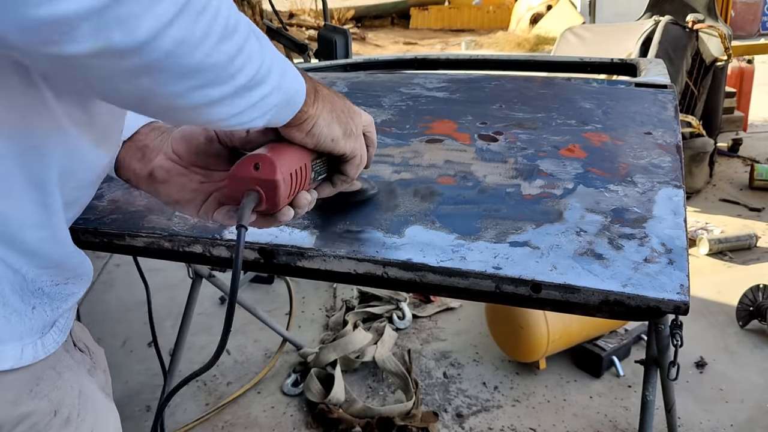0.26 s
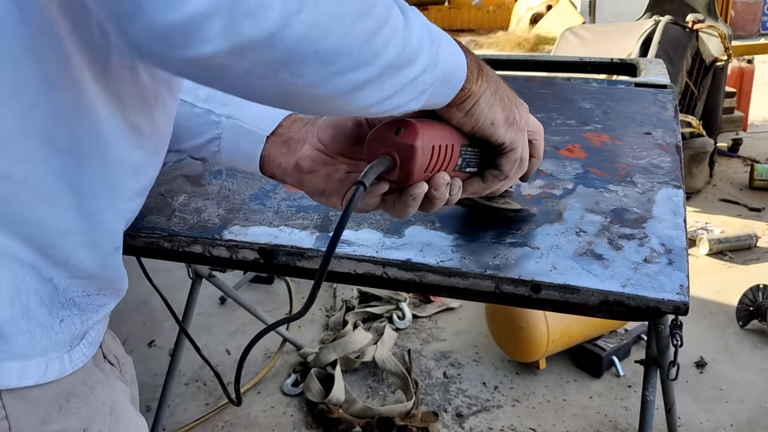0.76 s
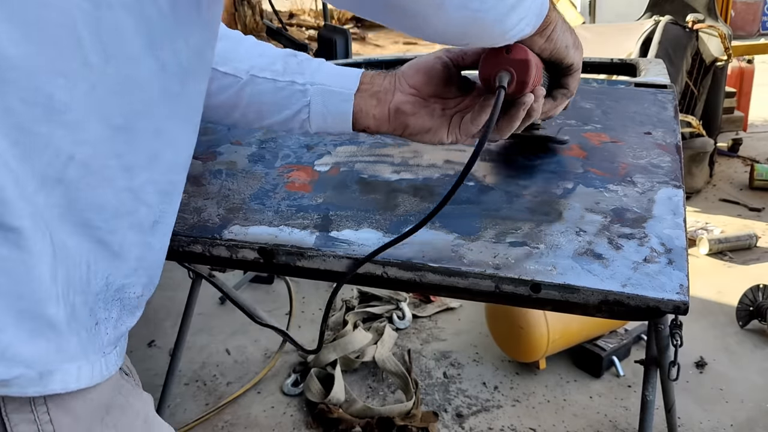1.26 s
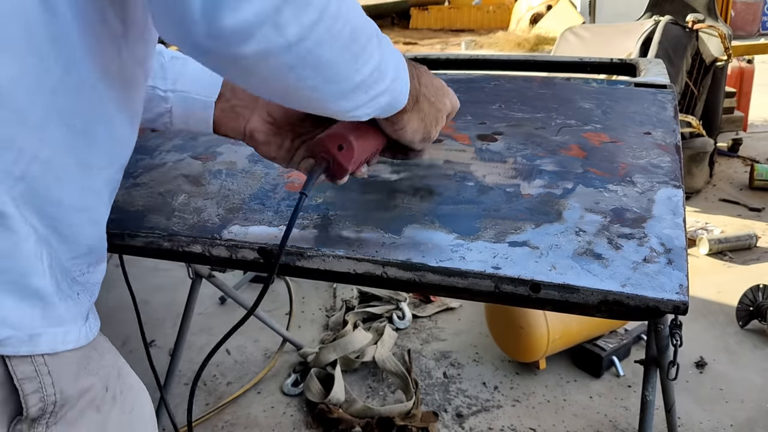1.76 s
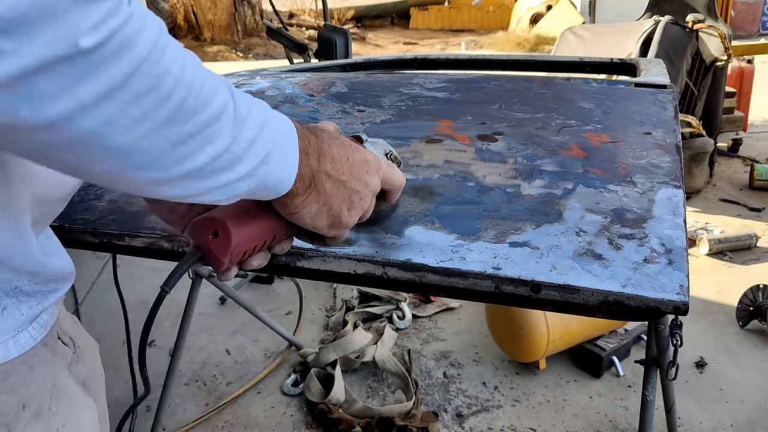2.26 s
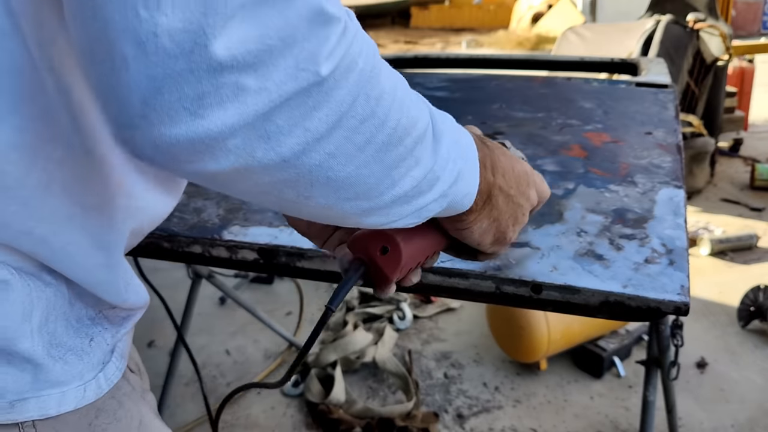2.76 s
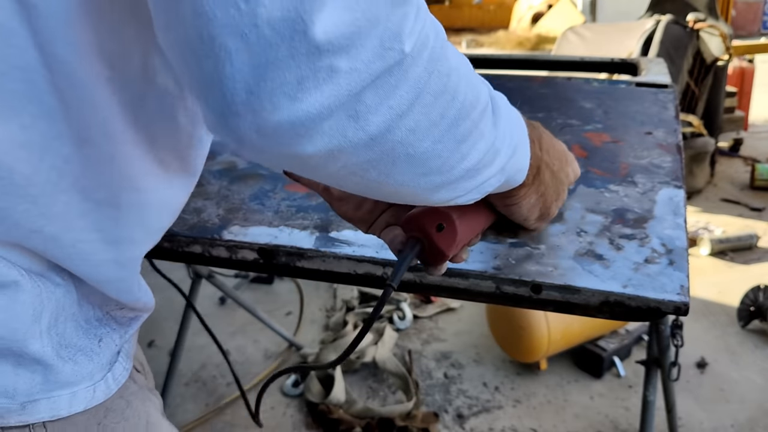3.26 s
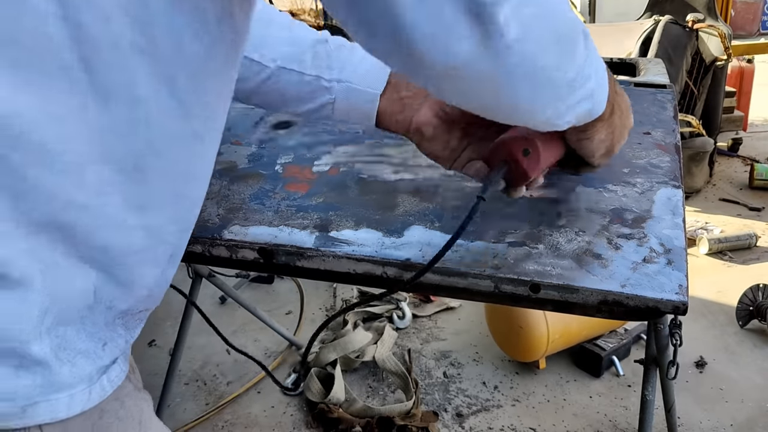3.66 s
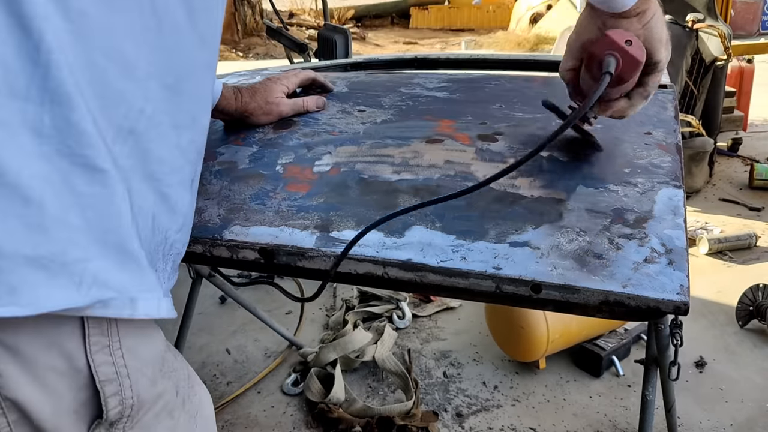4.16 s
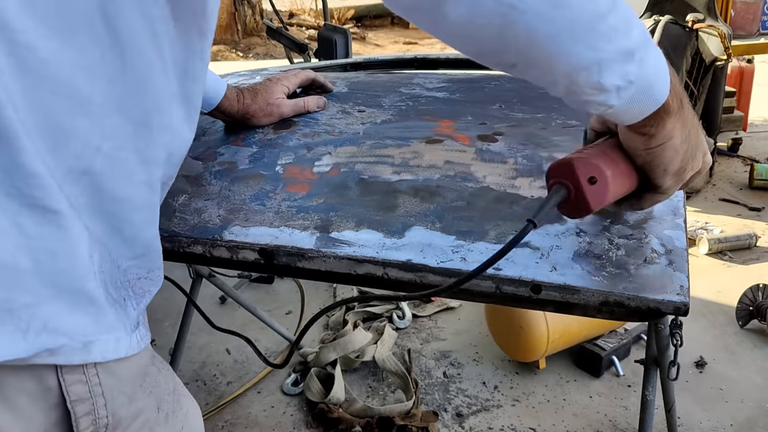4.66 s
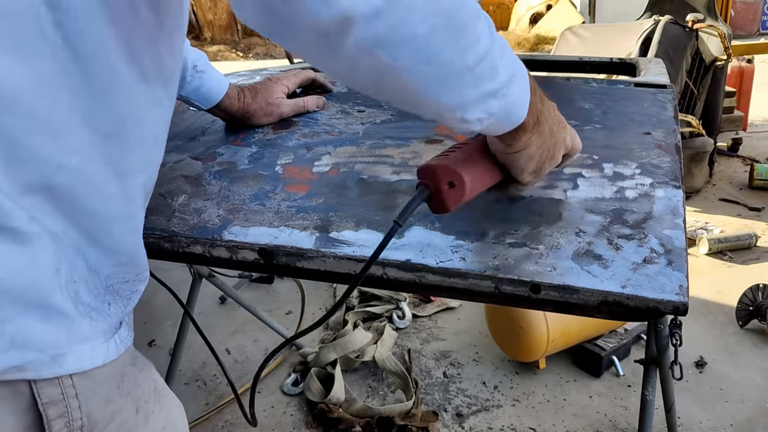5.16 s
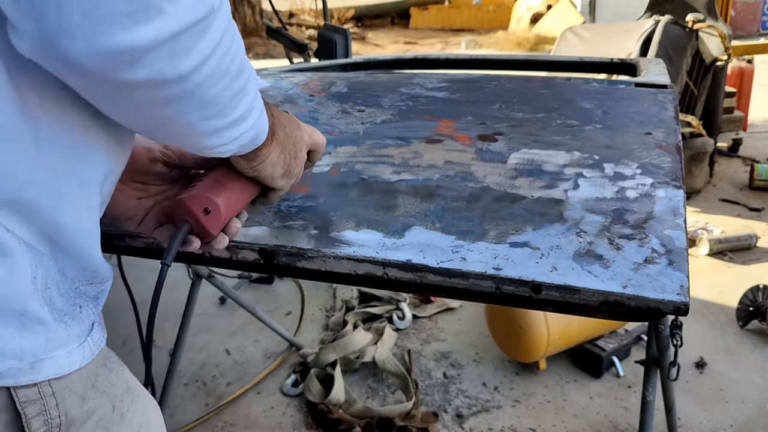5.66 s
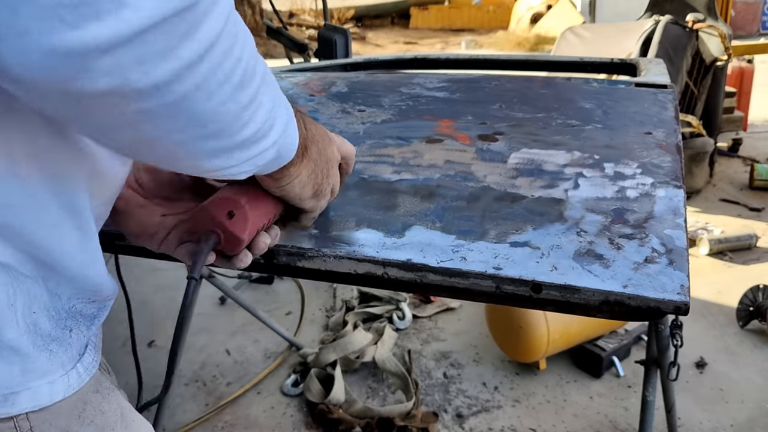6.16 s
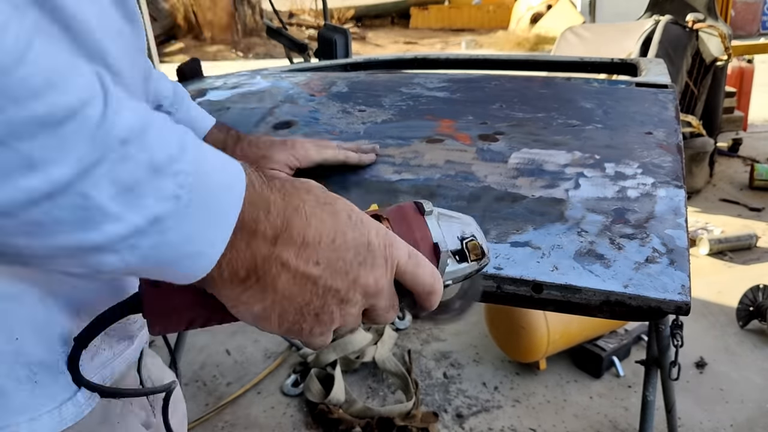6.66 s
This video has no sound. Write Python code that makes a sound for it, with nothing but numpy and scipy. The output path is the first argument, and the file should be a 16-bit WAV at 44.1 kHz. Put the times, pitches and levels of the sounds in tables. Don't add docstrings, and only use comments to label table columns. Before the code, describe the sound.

A handheld power tool whines shrilly as its wire brush rasps over a steel panel, pitch sagging and racing, then coasts down hissing outdoors.

```python
import sys
import numpy as np
from scipy import signal
from scipy.fft import rfft, irfft, next_fast_len
from scipy.io import wavfile
from scipy.ndimage import uniform_filter1d

SR = 44100
rng = np.random.default_rng(int(sys.argv[2]) if len(sys.argv) > 2 else 0)


def ratio(d):
    e = np.asarray(d, float) / 20
    return 10 ** e


def file_out(sig):
    cols = np.atleast_2d(sig).T
    lim = np.clip(cols, -1, 1)
    pcm = np.round(lim * 32767).astype(np.int16)
    wavfile.write(sys.argv[1], SR, pcm)


N = 305613
CONTROL_STEP = 40
STOP_S, SETTLED_S = 6.67, 6.75

# (f/Hz, left-right likeness 0..1)
LIKENESS = [(61, 0.01), (301, 1), (601, 0.88), (1201, 1), (2501, 1), (5001, 0.86), (9001, 0.48),
            (14001, 0.062)]
# (t/s, level/dB, half length/s)
SKIPS = [
    (0.235, 2, 0.01),
    (0.7, -2.5, 0.026),
    (3.53, -0.5, 0.022),
    (3.87, 3.5, 0.011),
    (4.47, -4, 0.034),
    (4.58, -3, 0.04),
    (4.76, -6.5, 0.016),
    (6.22, -14, 0.012),
]


def in_time(rows):
    s, *columns = np.transpose(rows)
    return [np.interp(np.arange(N) / SR, s, column) for column in columns]


def at_hz(points, hz):
    table_hz, value = np.transpose(points)
    return np.interp(np.log(hz), np.log(table_hz), value)


def bumps(rows):
    s = np.arange(0, N + CONTROL_STEP, CONTROL_STEP) / SR
    total = sum(height * np.exp(-.5 * ((s - at) / half) ** 2) for at, height, half in rows) + 0 * s
    return np.interp(np.arange(N) / SR, s, total)


def rms_one(x):
    return x / np.sqrt(np.mean(x ** 2) + 1e-20)


def drift(rate):
    r = np.exp(-2 * np.pi * rate * CONTROL_STEP / SR)
    coarse = rng.standard_normal(N // CONTROL_STEP + 2002)
    slow = signal.lfilter([1], [1, -2 * r, r * r], coarse)[2000:]
    return np.interp(np.arange(N) / CONTROL_STEP, np.arange(len(slow)), rms_one(slow))


def snags(low_hz, high_hz):
    band = signal.butter(2, [low_hz, high_hz], "band", fs=SR / CONTROL_STEP, output="sos")
    coarse = signal.sosfilt(band, rng.standard_normal(N // CONTROL_STEP + 2))
    return np.interp(np.arange(N) / CONTROL_STEP, np.arange(len(coarse)), rms_one(coarse))


def coloured(spectrum):
    size = next_fast_len(N)
    hz = np.maximum(np.arange(size // 2 + 1) * SR / size, 1)
    mid, side = rfft(rng.standard_normal((2, size)))
    alike = np.clip(at_hz(LIKENESS, hz), 0, 1)
    pair = np.sqrt(1 + alike) * mid + np.sqrt(1 - alike) * side * [[1], [-1]]
    return rms_one(irfft(pair * ratio(at_hz(spectrum, hz)), size)[:, :N])


def patchy(x, patchy_db):
    frames = signal.stft(x, SR, nperseg=512)[2]
    field = uniform_filter1d(rng.standard_normal(frames.shape[1:]), size=9, axis=0)
    field = uniform_filter1d(field, size=7, axis=1)
    frames = frames * ratio(patchy_db * rms_one(field))
    return rms_one(signal.istft(frames, SR, nperseg=512)[1][:, :N])


def shaft():
    # (t/s, speed/turns per s)
    pressed = [(0.0, 876.0), (0.086, 890.0), (0.799, 928.0), (1.282, 940.0), (1.903, 809.0), (2.395, 881.0),
               (3.138, 831.0), (3.412, 841.0), (3.469, 858.0), (3.538, 819.0), (3.563, 845.0),
               (3.677, 790.0), (3.725, 782.0), (4.422, 828.0), (4.498, 779.0), (4.954, 821.0),
               (5.161, 817.0), (6.701, 848.0)]
    # (t/s, change/turns per s, half
    # length/s)
    jolts = [(0.17, -14.0, 0.03), (0.54, 32.0, 0.038), (0.685, -29.0, 0.043), (1.026, -11.0, 0.109),
             (1.133, 12.0, 0.017), (1.217, -31.0, 0.025), (1.462, 13.0, 0.025), (1.586, 36.0, 0.026),
             (1.744, 22.0, 0.023), (1.888, 70.0, 0.038), (2.035, 34.0, 0.031), (2.189, -38.0, 0.044),
             (2.759, -22.0, 0.053), (2.816, 19.0, 0.043), (2.9, -16.0, 0.013), (3.076, -20.0, 0.017),
             (3.31, 20.0, 0.03), (3.593, -41.0, 0.023), (4.075, -37.0, 0.13), (4.151, 45.0, 0.039),
             (4.327, 17.0, 0.025), (4.745, 25.0, 0.017), (4.974, 39.0, 0.065), (5.35, -37.0, 0.019),
             (5.453, 32.0, 0.046), (5.593, 15.0, 0.022), (5.686, -13.0, 0.027), (5.85, -25.0, 0.043),
             (6.151, 66.0, 0.066), (6.351, -21.0, 0.032),
             (0.048, -12, 0.008), (0.216, -8, 0.05), (0.269, -13, 0.006), (0.305, 10, 0.011),
              (0.443, -12, 0.03), (0.553, -12, 0.011), (1.171, -11, 0.006), (1.449, 12, 0.006),
              (1.469, -12, 0.006), (1.792, -6, 0.02), (1.87, 7, 0.015), (1.906, -11, 0.008),
              (1.991, 10, 0.008), (2.095, -11, 0.011), (2.199, -10, 0.006), (2.281, 15, 0.008),
              (2.317, -13, 0.008), (2.353, 12, 0.008), (3.241, 11, 0.006), (3.528, -18, 0.006),
              (3.654, 11, 0.006), (3.676, -15, 0.006), (3.821, 11, 0.006), (3.857, 23, 0.006),
              (3.897, 18, 0.006), (3.939, -11, 0.02), (3.997, 11, 0.006), (4.071, -21, 0.006),
              (4.119, 14, 0.006), (4.302, 10, 0.006), (4.46, 11, 0.006), (4.504, -8, 0.015),
              (4.612, -10, 0.011), (4.671, 11, 0.006), (4.797, -10, 0.008), (4.955, 16, 0.011),
              (5.001, -10, 0.015), (5.184, 12, 0.006), (5.206, -12, 0.006), (5.533, -10, 0.008),
              (5.769, -10, 0.006), (5.831, -14, 0.006), (5.976, 10, 0.008), (6.114, 8, 0.011),
              (6.158, -10, 0.008), (6.198, 11, 0.008), (6.23, 34, 0.011), (6.29, 10, 0.008),
              (6.461, 9, 0.05), (6.617, -23, 0.015)]
    # (t/s, gain/turns per s, rise/s, fall/s)
    lifts = [
        (0.214, 136.0, 0.056, 0.11),
        (3.824, 142.0, 0.05, 0.032),
        (5.219, 302.0, 0.141, 0.202),
        (6.198, 216.0, 0.07, 0.17),
        (6.566, 132.0, 0.052, 0.022),
    ]
    s = np.arange(N) / SR
    turns = in_time(pressed)[0] + bumps(jolts)
    for at, gain, rise, fall in lifts:
        up = np.clip((s - at) / rise, 0, 1)
        smooth_rise = up ** 2 * (3 - 2 * up)
        turns = turns + gain * smooth_rise * np.exp(-np.maximum(s - at - rise, 0) / fall)
    return turns


def hold():
    # (t/s, level/dB, tilt of the high overtones/dB, left-right/dB)
    held = [(0.0, -45.5, -6.5, 3.5), (0.88, -49, -1.8, 2.5), (1.32, -48, -3.5, 2), (1.37, -47, -4.5, 3),
            (2.23, -48.5, -2.5, 1), (2.37, -44.5, -6, 3), (3.11, -50, -0.1, 0.7), (3.57, -51.5, -1.5, 1),
            (3.69, -48.5, -2.5, 1), (4.11, -50.5, -3, 1.5), (4.54, -48.5, -3, 1.5), (5.61, -46.5, -8, 2),
            (5.83, -47.5, -5.5, 2), (6.18, -45, -7.5, 3), (6.6, -46.5, -4, 2), (6.65, -55.5, -4, 3),
            (6.72, -63.5, 14, 5)]
    level_db, tilt_db, pan_db = in_time(held)
    skips_db = bumps(SKIPS)
    return level_db + 0.74 * skips_db, level_db + tilt_db + skips_db, pan_db


def whine(wobble_hz, slow_db, flutter, flutter_hz):
    # (f/Hz, level in the group/dB)
    body = [(801, -12), (1701, -5.5), (2201, -8.5), (2401, -14), (2651, -16), (3051, -5.5), (3501, -14.5),
            (4201, -11), (4601, -7.5), (5401, -9), (6101, -5), (7001, -9), (8701, -12.5), (11001, -6.5)]
    # (f/Hz, left-right/dB)
    lean_table = [(701, 1), (2401, 0), (8001, -1.5), (15001, 6)]
    # (t/s, multiple, level/dB, half length/s)
    swells_and_dips = [(0.754, 14, 4, 0.6), (0.992, 11, -3.5, 0.52), (1.116, 8, -5, 0.43), (1.283, 3, 3, 0.14),
                       (1.51, 4, 10, 0.085), (2.29, 3, -12, 0.072), (2.507, 3, 8, 0.13), (2.62, 5, 7, 0.051),
                       (2.76, 4, 5.5, 0.095), (2.91, 8, -5, 0.68), (3.317, 15, -9, 0.39), (3.313, 6, 6, 0.32),
                       (3.342, 7, 5, 0.1), (3.71, 5, 7.5, 0.058), (4.012, 8, -2, 0.47), (4.065, 3, -15, 0.026),
                       (4.422, 7, 3, 1), (4.641, 3, -15.5, 0.13), (4.802, 13, 5, 0.34), (4.923, 11, 9, 0.13),
                       (5.147, 4, 4.5, 0.79), (5.363, 9, -4, 0.048), (5.374, 4, 13, 0.04), (5.382, 6, -11.5, 0.16),
                       (5.59, 16, -25, 0.29), (5.881, 3, 8, 0.12), (5.91, 7, -6, 0.1), (6.214, 4, 9.5, 0.066),
                       (6.287, 6, -7, 0.072), (6.34, 5, -13, 0.023),
                       (0.267, 2, 19, 0.016), (0.31, 2, 18.5, 0.015), (0.467, 1, -12, 0.066), (1.204, 2, 6.5, 0.25),
            (1.37, 1, -11.5, 0.34), (2.234, 2, -14, 0.072), (2.567, 1, -12, 0.18), (3.916, 2, -11, 0.08),
            (4.274, 1, -10, 0.08), (4.653, 1, 11, 0.18), (4.766, 2, 4, 0.18), (5.918, 1, 8, 0.2),
            (5.982, 2, 16, 0.098), (6.39, 1, -10, 0.045), (6.556, 2, -12, 0.12),
                       (2.16, 1, 10.5, 0.076),
        (1.07, 1, 8, 0.058),
        (1.9, 2, 5, 0.054),
        (1.94, 1, 11, 0.046),
        (4.02, 1, 13.5, 0.058),
        (4.7, 1, 11.5, 0.071),
        (4.97, 1, -12, 0.051),
        (6.62, 3, 2, 0.014),
                       (0.38, 13, 4, 0.052), (0.438, 7, 3, 0.084), (0.519, 5, 2.5, 0.098), (0.54, 15, 4, 0.18),
               (0.55, 3, 0, 0.058), (0.99, 10, -8, 0.056), (1.603, 3, 2.5, 0.44), (1.686, 8, 7.5, 0.053),
               (1.696, 13, 3.5, 0.11), (1.95, 15, -1, 0.12), (2.38, 11, -7, 0.081), (2.515, 7, 5, 0.021),
               (2.67, 7, -4.5, 0.083), (3.096, 5, 2.5, 0.12), (3.24, 4, 11, 0.02), (3.27, 8, 7.5, 0.039),
               (3.772, 16, 4, 0.18), (3.88, 7, -1.5, 0.044), (4.213, 4, -12, 0.042), (4.34, 13, 4.5, 0.091),
               (4.94, 11, -2.5, 0.068), (5.08, 7, -1.5, 0.22), (5.402, 3, 6.5, 0.057), (5.41, 6, 2, 0.32),
               (5.53, 7, 3.5, 0.099), (5.587, 13, 3.5, .2), (5.83, 11, 5.5, 0.17), (5.852, 9, -5, .07),
               (5.97, 15, -4, 0.15), (6.2, 7, 5, 0.093), (6.64, 4, 10, 0.037), (6.635, 5, 4, 0.033),
               (0.29, 1, 7, 0.022), (3.29, 1, 3.5, 0.27), (5.3, 1, 2.5, 0.44),
                       (0.828, 13, 7, 0.039), (0.872, 3, -5.5, 0.07), (0.986, 6, -5, 0.056), (1.98, 17, -6, .08),
              (2.36, 13, -6, 0.09), (2.797, 9, -2, 0.41), (2.84, 17, -10, .3), (3.65, 11, -4.5, .2),
              (3.75, 16, -6, .13), (3.83, 17, -8, .3), (4.74, 10, -2.5, .3), (4.76, 15, -1, 0.24),
              (5.06, 14, -5, .08), (5.76, 12, 2.5, .2), (4.385, 2, -8, 0.041), (3.422, 13, 1, 0.04),
              (3.42, 14, 3, 0.071)]
    # (t/s, level/dB, half length/s)
    blurs = [
        (0.24, -1, 0.024),
        (1.09, -1.5, .03),
        (3.53, -2, 0.017),
        (3.65, 0, 0.094),
        (3.865, -4.5, 0.015),
        (4.2, 2, 0.036),
        (4.6, -1.5, .07),
        (5.1, -1, 0.085),
        (5.6, 0.5, 0.13),
        (6.645, -2, 0.017),
    ]
    fan_order = 18
    low_db, fan_db = -68.5, -46.5
    mid_db, high_db, pan_db = hold()
    s = np.arange(N) / SR
    turns = shaft()
    fan_db = fan_db + bumps(SKIPS) - np.clip(fan_order * turns - 15450, 0, 400)
    glide_db = -0.5 * np.abs(np.gradient(turns)) * SR / 1000
    load = np.clip((980 - turns) / 120, .4, 1.8)
    turns = turns + load * wobble_hz * snags(20, 46) + 1.4 * drift(90)
    phase = 2 * np.pi * np.cumsum(turns) / SR
    grip_db = 1.0 * drift(12.3)
    blur_db = bumps(blurs)
    moments = swells_and_dips
    out = np.zeros((2, N))
    for k in range(1, 20):
        hz = k * np.mean(turns)
        if k == fan_order:
            level_db = fan_db
        else:
            group_db = low_db if k < 3 else mid_db if k < 10 else high_db
            level_db = group_db + at_hz(body + [(15000, -11)], k * turns)
        caught_db = bumps([(at, db, half) for at, multiple, db, half in moments if multiple == k])
        level_db = level_db + caught_db + (blur_db + glide_db) * (k > 2)
        level_db = level_db + grip_db + slow_db * drift(0.87)
        carrier = np.exp(1j * (k * phase + rng.uniform(0, 2 * np.pi)))
        rate = flutter_hz * k ** 0.38
        loose = flutter * (k / 7) ** 0.2 * ratio(-.6 * np.maximum(caught_db, 0))
        if k == fan_order:
            loose = loose * .45
        mid = 1 + loose * (snags(9, 34 + rate) + 1j * drift(rate))
        unlike = 1 - np.clip(at_hz(LIKENESS, hz), 0, 1)
        side = np.sqrt(unlike / 2) * (drift(rate * 0.61) + 1j * drift(rate * 0.35))
        level = ratio(level_db) / np.sqrt(.5 + loose ** 2)
        lean = ratio((pan_db + at_hz(lean_table, hz)) / 2 * [[1], [-1]])
        end_s = STOP_S + .01 - .06 * (k < 3)
        fade = np.clip((end_s - s) / .03, 0, 1)
        out += fade * level * lean * np.real(carrier * (mid + side * [[1], [-1]]))
    return out


def bristles():
    # (f/Hz, level per Hz/dB)
    wire = [(1510, -26), (2410, -18.5), (3210, -11), (4410, -8.5), (6010, -10.5), (8510, -10.5),
            (11010, -6.5), (14010, -4), (16010, -13)]
    # (t/s, level/dB)
    rasp = [(0, 0), (0.75, -0.5), (1.05, 1), (1.65, -1.5), (2.25, 0.5), (2.55, -3), (2.85, 0), (3.15, -1.5),
            (3.75, 0), (4.35, 1), (4.65, 1.5), (5.25, -1.5), (5.55, -2), (5.85, 0.5), (6.15, 1.5),
            (6.45, -5), (6.7, -1)]
    mid_db, high_db, pan_db = hold()
    level_db = -6 + in_time(rasp)[0] + .8 * drift(18)
    hiss = patchy(coloured(wire), patchy_db=3.0)
    low = signal.sosfiltfilt(signal.butter(2, 7700, fs=SR, output="sos"), hiss)
    both = low * ratio(mid_db - 2.5) + (hiss - low) * ratio(high_db + 0.5)
    return both * ratio(level_db + pan_db / 2 * [[1], [-1]])


def panel(x):
    # (f/Hz, level/dB, t60/s)
    modes = [
        (2840, 7, .36),
        (2910, 8, .42),
        (2975, 7, .33),
    ]
    out = 0
    for hz, db, t60 in modes:
        r = ratio(-60 / (t60 * SR))
        b = [(1 - r * r) / 2, 0, (r * r - 1) / 2]
        a = [1, -2 * r * np.cos(2 * np.pi * hz / SR), r * r]
        out = out + ratio(db) * signal.lfilter(b, a, x)
    return out


def reflections(x, t60, gap_s):
    s = np.arange(int(.4 * SR)) / SR
    common, own = rng.standard_normal((2, len(s)))
    tail = (common + 0.12 * own * [[1], [-1]]) * ratio(-60 * s / t60) * (s > gap_s)
    tail = signal.sosfilt(signal.butter(1, 11000, fs=SR, output="sos"), tail)
    return signal.fftconvolve(x, tail / np.sqrt(np.sum(tail ** 2) / 2), axes=1)[:, :N]


def yard():
    # (f/Hz, level per Hz/dB)
    murmur = [(35, -55), (60, -29), (203, 5), (656, 3), (853, 4.5), (1030, -8.5), (1240, 16), (1310, 9.5),
              (1400, -18), (1530, 15.5), (1740, 8), (1870, 8), (2400, 10.5), (3120, -48), (5280, -120)]
    settling_db = np.interp(np.arange(N) / SR, [STOP_S, SETTLED_S], [0, -4.0])
    return ratio(-78 + settling_db) * patchy(coloured(murmur), patchy_db=2.5)


def wind(small_db, small_per_s, puff_hz, vent_hz):
    # (t/s, peak/dB)
    pops_left = [(0.17, -58), (0.338, -61), (0.601, -59), (0.64, -54.5), (1.579, -60), (1.689, -66),
                 (3.477, -52), (3.64, -65), (3.651, -68), (3.7, -63), (4.141, -52.5), (4.223, -62),
                 (4.264, -61), (4.355, -54), (4.384, -79), (6.286, -56)]
    # (t/s, peak/dB)
    pops_right = [(0.366, -50.5), (0.762, -52.5), (0.935, -52), (1.024, -55), (1.18, -47.5), (1.302, -52),
                  (1.346, -55), (1.5, -52), (1.528, -48.5), (1.694, -54), (1.739, -46), (1.984, -55),
                  (2.344, -53), (2.696, -52.5), (2.753, -54), (2.83, -54), (2.974, -46.5), (3.101, -53),
                  (3.125, -53), (3.47, -55), (3.496, -53), (3.972, -54), (4, -54), (4.024, -51.5),
                  (4.056, -53), (4.406, -52), (4.437, -50), (4.94, -51), (6.291, -54), (6.418, -48.5)]
    faint_pops = [0.133, 0.166, 0.434, 0.533, 0.615, 0.717, 0.828, 0.89, 1.259, 1.381, 1.828, 2.125, 2.268,
                  2.313, 2.618, 2.66, 2.86, 2.875, 3.536, 3.822, 4.091, 4.112, 4.218, 4.258, 4.334, 4.86,
                  5.504, 5.818, 6.507, 6.562]
    # (t/s, port 0 left 1 right, peak/dB)
    pushes = [(0.131, 1, -65), (0.16, 0, -62), (0.412, 0, -58), (1.45, 1, -55.5), (1.629, 0, -60),
              (2.393, 1, -61), (2.454, 1, -61), (2.816, 1, -63), (2.958, 1, -62), (3.204, 1, -48.5),
              (3.309, 1, -55), (3.53, 0, -74), (3.688, 0, -56), (3.924, 1, -52), (4.214, 0, -53.5),
              (4.254, 0, -51.5), (4.306, 1, -57), (4.316, 0, -50.5), (4.362, 1, -58), (4.376, 0, -49),
              (4.972, 1, -59), (4.991, 1, -56), (5.156, 1, -57.5), (5.428, 0, -61), (5.529, 1, -55),
              (6.462, 1, -57)]
    kicks = ratio(small_db + 4.5 * rng.exponential(1, (2, N))) * rng.choice([-1, 1], (2, N))
    kicks = kicks * (rng.random((2, N)) < small_per_s / SR)
    shape = np.zeros(4000)
    shape[0] = -1
    shape = signal.sosfilt(signal.bessel(2, puff_hz, fs=SR, output="sos"), shape)
    shape = signal.sosfilt(signal.bessel(2, vent_hz, "high", fs=SR, output="sos"), shape)
    lead = np.argmin(shape)
    for port, pops in enumerate((pops_left, pops_right)):
        s, peak_db = np.transpose(pops)
        kicks[port, np.maximum((s * SR).astype(int) - lead, 0)] = ratio(peak_db)
    faint_db = -57.5 + 3 * rng.standard_normal(len(faint_pops))
    kicks[1, (np.array(faint_pops) * SR).astype(int) - lead] = ratio(faint_db)
    for s, port, peak_db in pushes:
        kicks[int(port), int(s * SR) - lead] = -ratio(peak_db)
    return signal.fftconvolve(kicks, shape[None] / -shape[lead])[:, :N]


def gust():
    # (t/s, left level/dB, right level/dB, half length/s)
    puffs = [
        (3.533, -63.5, -67, 0.0088),
        (3.643, -69, -76, 0.054),
        (4.64, -82, -75, 0.092),
        (5.89, -77, -72, 0.059),
        (6.806, -68.5, -78, 0.057),
        (6.858, -55, -97, 0.0067),
        (6.914, -56, -66, 0.015),
    ]
    rumble = rng.standard_normal((2, N))
    rumble = signal.sosfilt(signal.butter(1, [100, 400], "band", fs=SR, output="sos"), rumble)
    rumble = signal.sosfilt(signal.butter(2, 1100, fs=SR, output="sos"), rumble)
    left = bumps([(s, ratio(db), half) for s, db, _, half in puffs])
    right = bumps([(s, ratio(db), half) for s, _, db, half in puffs])
    return (ratio(-90.5) + np.array([left, right])) * rms_one(rumble)


def far_engine():
    # (t/s, f/Hz, level/dB)
    passing = [
        (3.8, 603, -99),
        (4.2, 559, -83),
        (4.65, 538, -71),
        (5.2, 514, -83.5),
        (6.0, 503, -96),
    ]
    hz, level_db = in_time(passing)
    heard = np.interp(np.arange(N) / SR, [3.5, 3.8, 6.0, 6.3], [0, 1, 1, 0])
    level = heard * ratio(level_db + 2.0 + 1.5 * drift(24.0))
    return level * np.sin(2 * np.pi * np.cumsum(hz) / SR)


def closing_hiss():
    # (f/Hz, level per Hz/dB)
    air = [(1210, -47), (2610, -8), (4410, -10), (6010, 3), (7510, -5.5), (11010, -5.5), (14010, 2),
           (16010, -2)]
    # (t/s, level/dB)
    course = [
        (6.56, -93),
        (6.63, -84),
        (6.69, -64),
        (6.81, -59),
        (6.87, -61),
        (6.93, -76),
    ]
    # (t/s, f/Hz, level/dB)
    fan = [
        (6.83, 15700, -100.5),
        (6.845, 15400, -48),
        (6.89, 13200, -53),
        (6.91, 12400, -91.5),
    ]
    turn = 2 * np.pi * np.cumsum(152 + 25 * drift(30)) / SR
    ticks = np.exp(3.0 * (np.cos(turn) - 1)) * ratio(2.1 * drift(60))
    high_pass = signal.butter(2, 11800, "high", fs=SR, output="sos")
    bright = signal.sosfilt(high_pass, coloured(air) * ticks)
    hz, fan_db = in_time(fan)
    note = ratio(fan_db - 6.0) * (.5 + ticks) * np.sin(2 * np.pi * np.cumsum(hz) / SR)
    return (coloured(air) + 4.5 * bright) * ratio(in_time(course)[0]) + note


def scene():
    tool = whine(wobble_hz=3.6, slow_db=.6, flutter=.55, flutter_hz=8) + bristles()
    echoes = reflections(tool, t60=.16, gap_s=.004)
    tool = tool + panel(tool) + ratio(-6.0) * echoes
    air = wind(small_db=-81.5, small_per_s=27, puff_hz=93.0, vent_hz=8.7) + gust()
    return tool + yard() + air + far_engine() + closing_hiss()


def low_pass(x):
    return signal.sosfilt(signal.butter(12, 15560, fs=SR, output="sos"), x)


def record(dry):
    return low_pass(dry)


dry = scene()
out = record(dry)
file_out(out)
```